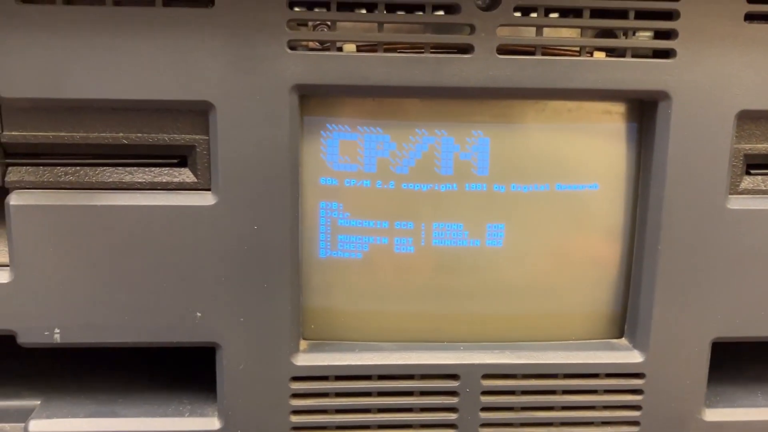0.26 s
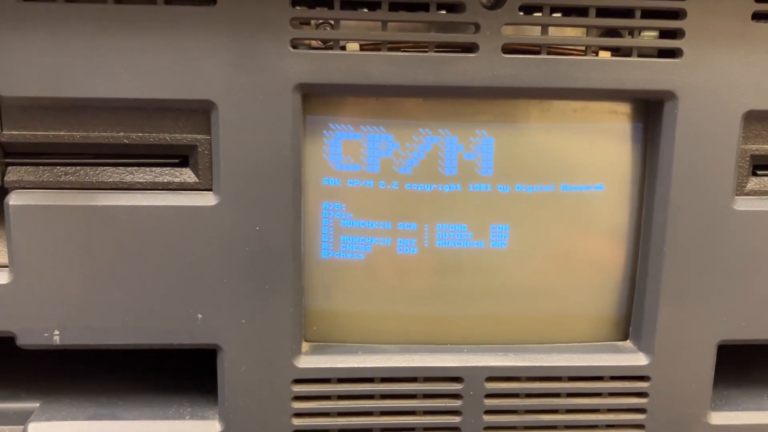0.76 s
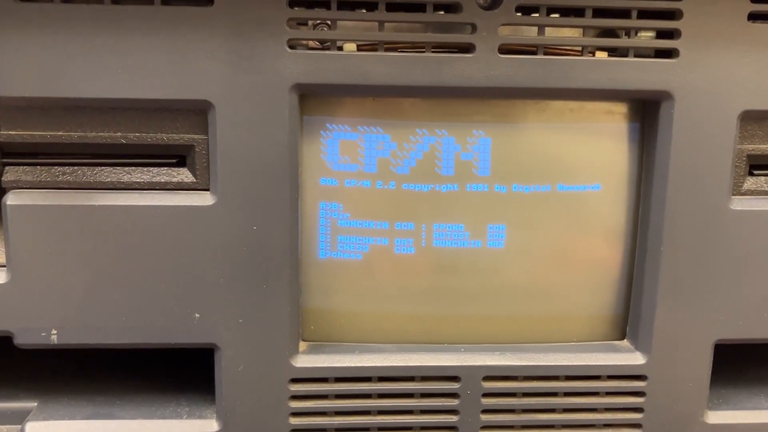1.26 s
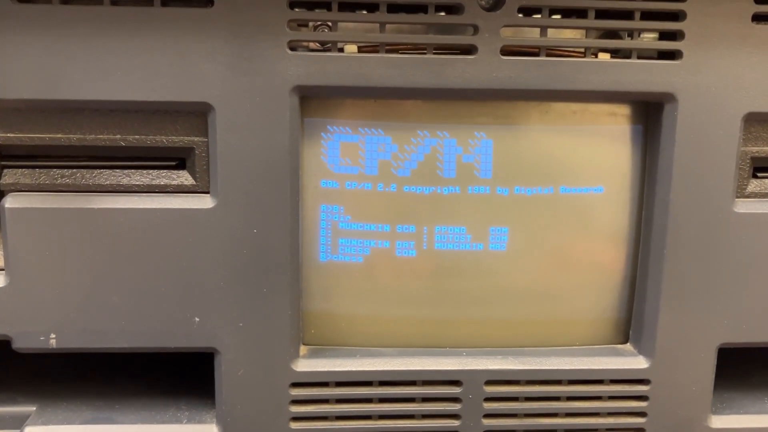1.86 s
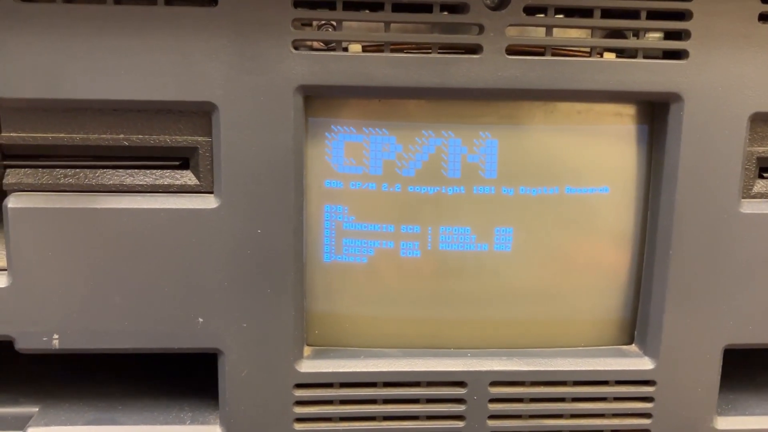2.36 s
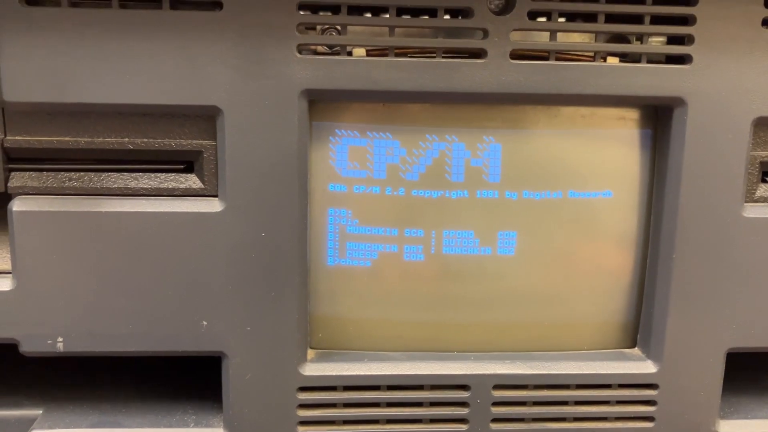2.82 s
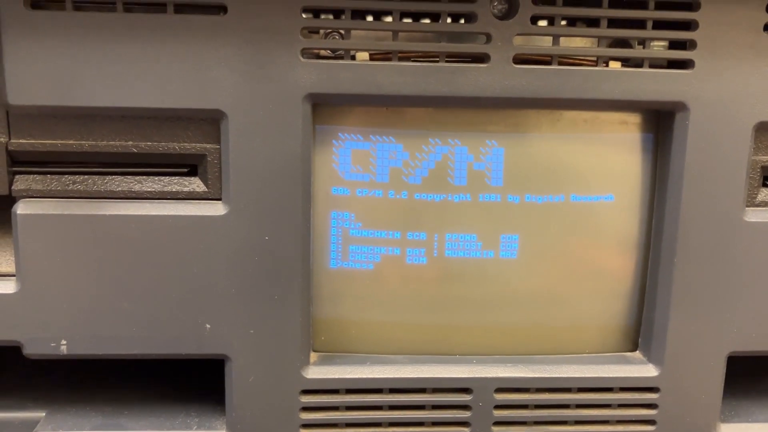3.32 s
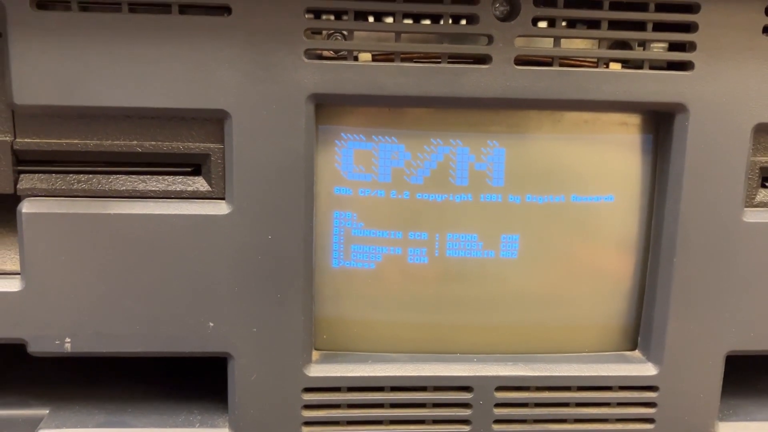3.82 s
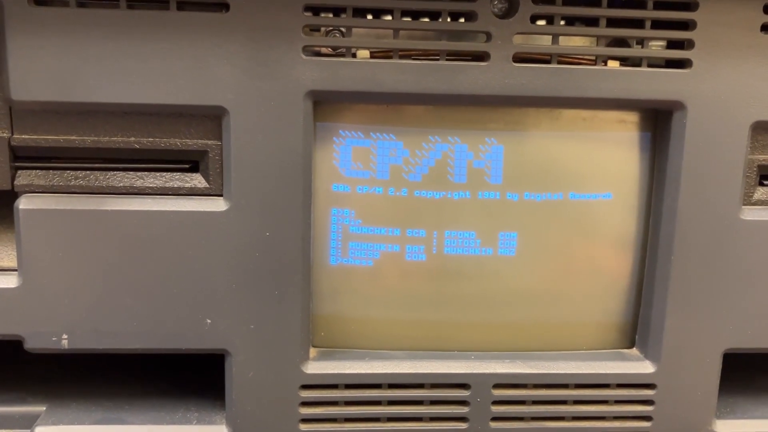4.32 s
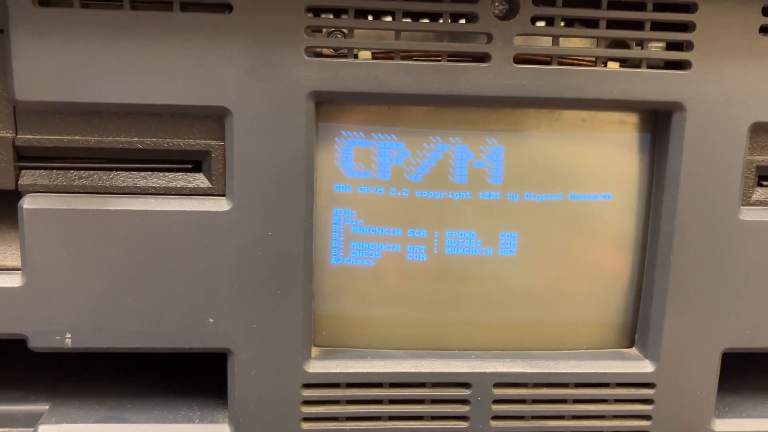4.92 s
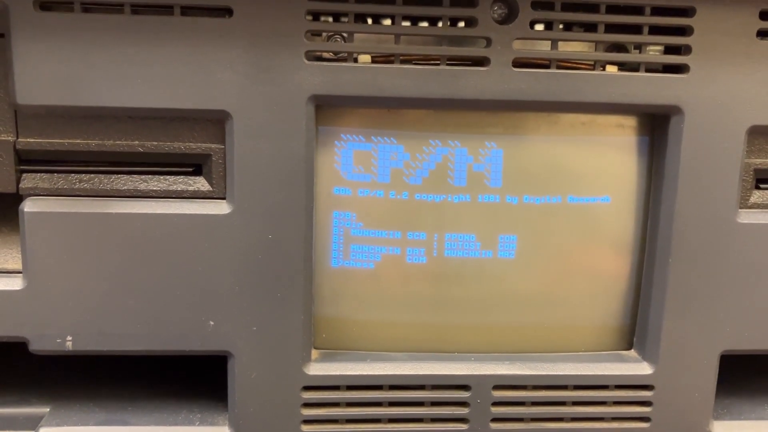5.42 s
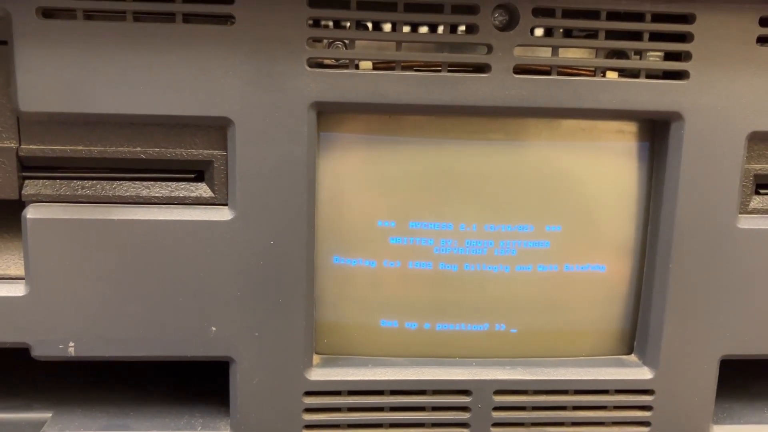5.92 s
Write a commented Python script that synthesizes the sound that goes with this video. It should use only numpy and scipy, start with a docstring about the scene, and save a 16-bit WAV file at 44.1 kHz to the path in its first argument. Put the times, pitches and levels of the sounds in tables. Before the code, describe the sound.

An old computer is heard from close by indoors. Throughout, a drive motor whines with a light hiss and faint fast ticking, over a low mains hum, a soft rush of air and a thin, very high picture tube whistle. The spinning disk ticks faintly five times a second. From the start until about 3.1 seconds, the floppy drive's head steps six times, one short double click every 0.6 seconds. Soft low bumps come irregularly between 0.6 and 5.4 seconds, and small dry clicks fall near 2, 3.9 and 4.4 seconds. From 3.7 to 4.4 seconds the head makes a long seek, a buzzing growl with rattling rasps, strongest at its start. A second seek follows from 4.5 to 5.2 seconds, rasping more toward its end. The machine then idles, whining and humming, until about 6 seconds.

```python
"""An old computer heard from close by. From the start a motor turns (whine, brush noise, a bright tick
each turn), the disk ticks, the picture tube whistles and the mains hums over the rush of case and room.
For three seconds the disk head steps one track at a time; soft low bumps come and go, and from 2 s
something small clicks now and then. At 3.7 s and 4.5 s the head makes two long runs across the disk
(seeks): its stepper motor growls, and its carriage rasps where it binds. Then the machine idles."""
import sys
import numpy as np
from scipy.fft import rfft, irfft, next_fast_len
from scipy.io import wavfile
from scipy.ndimage import map_coordinates

SR = 44100
rng = np.random.default_rng(int(sys.argv[2]) if len(sys.argv) > 2 else 0)


def store_wav(level_fs):
    """Save 16-bit WAV to argv[1]."""
    pcm = np.round(np.clip(np.atleast_2d(level_fs), -1, 1) * 32767)
    wavfile.write(sys.argv[1], SR, pcm.T.astype(np.int16))


N = 272538
TIME = np.arange(N) / SR
STEP_S, DISK_TURN_S = .02003, .20045  # time between seek steps, time for one disk turn

# the two seeks: start t/s, stop t/s, smooth-step rattle level/dB, growl level/dB (both relative)
SEEKS = [(3.678, 4.351, -43.5, -42.5), (4.513, 5.227, -50.5, -44)]
# how far a wave at the left microphone port is ahead of the right: f/Hz, lead/rad
LEFT_LEAD = [(0, 0), (40, -.7), (130, -.6), (200, 0), (900, 0), (1600, -.9), (2200, -1.9), (3000, -3.4),
             (5860, -10.4), (9560, -16.1), (15600, -25)]


def amp(db):
    """Turn decibels into a factor to multiply by."""
    return 10 ** (np.asarray(db) / 20)


def along(points, hz):
    """Read a curve of (frequency, value) points at hz, on a log frequency axis."""
    f, value = np.transpose(points)
    return np.interp(np.log(hz + 1), np.log(f + 1), value)


def wobble(rate):
    """A smooth random curve through `rate` new values a second."""
    coarse = TIME[::32]
    values = rng.standard_normal(int(N * rate / SR) + 4)
    return np.interp(TIME, coarse, map_coordinates(values, [coarse * rate]))


def noise(db):
    """Two unrelated white noises at a level that may change over time."""
    return amp(db) * rng.standard_normal((2, N))


def filtered(x, response):
    """Scale and delay each frequency of x as response(hz) says."""
    size = next_fast_len(N + SR // 2)
    return irfft(rfft(x, size) * response(np.fft.rfftfreq(size, 1 / SR)), size)[..., :N]


def ringing(table):
    """The response of a part that rings at each row's (frequency, width, relative level)."""
    return lambda hz: sum((-1) ** k * amp(db) * 1j * hz * width / (f * f - hz * hz + 1j * hz * width)
                          for k, (f, width, db) in enumerate(table))


def ringing_between(table, low_hz, high_hz):
    """The same ringing, fading steeply below low_hz and above high_hz."""
    return lambda hz: ringing(table)(hz) / (1 + (hz / high_hz) ** 16 + (low_hz / (hz + 1)) ** 8)


def at_mic(pair, colour):
    """Shape two noises by `colour` (tone, not level) and blend them into the two microphone ports."""
    # how alike left and right are: f/Hz, likeness/0-1
    likeness = [(30, 0.35), (100, 0.7), (300, 0.99), (800, 0.55), (2000, 0.6), (5000, 0.36), (9000, 1),
                (14000, 1)]
    # how much louder the left is: f/Hz, left minus right/dB
    balance = [(60, 2.5), (200, -2), (500, 6), (850, 3.5), (1290, 4.5), (2000, 8.5), (2800, 9), (3600, 2.5),
               (5000, 5), (6500, -1.5), (15000, 1.5)]

    def response(hz):
        angle = np.arccos(np.clip(along(likeness, hz), 0, 1)) / 2
        blend = np.array([[np.cos(angle), np.sin(angle)], [np.cos(angle), -np.sin(angle)]])
        lead = np.interp(hz, *np.transpose(LEFT_LEAD))
        left = amp(along(balance, hz) / 2) * np.exp(.5j * lead)
        return colour(hz) * blend * [[left], [1 / left]]
    power = np.mean(np.abs(colour(np.fft.rfftfreq(8192, 1 / SR))) ** 2)
    return filtered(pair, response).sum(axis=1) / np.sqrt(power)


def track_steps():
    """Six track changes, one every third disk turn: a soft contact, then a harder one."""
    # the two contacts: rattle level/dB, treble share/dB, brightness/dB, slide length/s
    soft = (-41, -21, 0, .007)
    hard = (-36.5, -18, 4.5, .008)
    rows = []
    for start in .068 + 3 * DISK_TURN_S * np.arange(6):
        rows += [(start - .0185, *soft), (start, *hard)]
    return rows


def seek_steps():
    """A seek steps at a fixed rate: smoothly, except where the carriage binds and rasps."""
    # rasps: t/s, length/s, first rattle level/dB, last rattle level/dB, treble share/dB, brightness/dB
    rasps = [(3.678, .1, -31.5, -39, -17, 3), (3.798, .06, -35.5, -39, -14, 3),
             (3.958, .06, -38.5, -37, -16, 3), (4.119, 0, -39.5, -39.5, -20, 2),
             (4.179, .16, -38.5, -40, -13, 0), (4.513, .04, -36, -39, -16, -1),
             (4.693, .06, -45, -39, -19, 2), (4.914, .02, -48, -44, -26, -2),
             (5.014, .06, -43, -37.5, -21, -1), (5.094, .12, -39.5, -36, -20, 0)]
    # a smooth step: treble share/dB, brightness/dB
    smooth = (-28, -2)
    rows = []
    for start, end, smooth_db, _ in SEEKS:
        when = np.arange(start, end, STEP_S)
        rattle, treble, bright, slide_s = np.outer([smooth_db, *smooth, .0098], np.ones(len(when)))
        for first, span, first_db, last_db, treble_db, bright_db in rasps:
            inside = np.abs(when - first - span / 2) < (span + STEP_S) / 2
            rattle[inside] = np.interp(when[inside], [first, first + span + 1 / SR], [first_db, last_db])
            treble[inside], bright[inside] = treble_db, bright_db
        late, louder, brighter = rng.standard_normal((len(when), 3)).T
        rows += zip(when + .0003 * late, rattle + .5 * louder, treble, bright + 2 * brighter, slide_s)
    return rows


def disk_head():
    """Each step strikes the head's carriage, rattles it while it slides, then stops short."""
    # the parts that ring: f/Hz, width/Hz, relative level/dB
    carriage_low = [(1540, 138, 0.5), (1986, 280, -5), (2230, 153, -1.5), (2708, 215, -2)]
    carriage_high = [(3110, 240, -9), (3462, 146, -0.5), (4096, 130, -1), (4156, 136, -3.5)]
    drive_housing = [(466, 49, 5), (762, 97, 2.5), (953, 250, -4), (1270, 280, -6.5)]
    guide_rail = [(4800, 480, 0.5), (5600, 570, -1), (6640, 360, 0), (7540, 180, -3), (7990, 180, -1)]
    low, mid, high = np.zeros((3, 2, N + SR))
    t = np.arange(SR // 20) / SR
    repeated = rng.standard_normal((2, len(t)))  # the part of the rattle that every step shares
    attack = 1 - np.exp(-t / .00012)
    blow = 1.3 * amp(-60 * t / .0018)
    grinding_tail = amp(-9 - 60 * t / .19)
    for start, db, treble_db, bright_db, slide_s in track_steps() + seek_steps():
        slide = amp(-250 * t - 2600 * np.clip(t - slide_s, 0, 1))
        rattle = .33 * repeated + .83 * rng.standard_normal(repeated.shape)
        burst = amp(db) * attack * (blow + slide + grinding_tail) * rattle
        at = slice(round(start * SR), round(start * SR) + len(t))
        low[:, at] += burst
        mid[:, at] += burst * amp(bright_db)
        high[:, at] += burst * amp(treble_db + 1.5 - 600 * t)
    carriage = amp(-3) * at_mic(low[:, :N], ringing_between(carriage_low, 840, 4200))
    carriage += amp(-10) * at_mic(mid[:, :N], ringing_between(carriage_high, 1200, 5750))
    housing = amp(-5.5) * at_mic(low[:, :N], ringing_between(drive_housing, 270, 1650))
    rail = at_mic(high[:, :N], ringing_between(guide_rail, 2900, 8800))
    return carriage + housing + rail


def stepper_growl():
    """During a seek the stepper shakes the frame: wavering multiples of the step rate over a rumble."""
    # the growl's tones: multiple of the step rate
    multiples = [2, 3, 4, 5, 6, 7, 8, 9, 10, 11, 12, 14, 15, 16]
    # one for each tone: relative level/dB
    tone_levels = [-1.5, -3, -2.5, -5, -16.5, -17, -12, -7.5, -12, -8.5, -13.5, -12, -9.5, -29]
    # boost of the tone at three times the step rate: t/s, level/dB
    third_boost = [(3.7, -3), (3.9, -0.5), (4.12, 5.5), (4.35, 1), (4.55, -5), (4.65, -15), (4.8, 8),
                   (5.2, 3.5)]
    # the ringing frame: f/Hz, width/Hz, relative level/dB
    frame = [(141, 109, -5), (257, 44, -7), (450, 57, -16), (574, 120, -9.5), (890, 300, -13.5)]
    attack_s, release_s = .016, .064
    level = sum(amp(db) * np.interp(TIME, [start, start + attack_s, end, end + release_s], [0, 1, 1, 0])
                for start, end, _, db in SEEKS)
    level *= amp(-9 * np.exp(-((TIME - 4.23) / .05) ** 2))  # the growl dips briefly
    third_db = np.interp(TIME, *np.transpose(third_boost))
    tones = 0
    for multiple, db in zip(multiples, tone_levels):
        gain = amp(db + 2.6 * wobble(10) + third_db * (multiple == 3))
        phase = 2 * np.pi * (multiple * TIME / STEP_S + rng.uniform()) + .21 * wobble(6)
        tones += gain * np.sin(phase)
    rumble = at_mic(level * noise(-3), ringing(frame))
    return np.sqrt(2) * level * tones + rumble


def motor():
    """The shaft whines, the brushes pulse as it turns, the bearings hiss, and each turn gives a tick."""
    # the whine's tones: multiple of the turning speed
    multiples = [6, 7, 8, 10, 13, 14, 15, 17, 19, 21, 22, 24, 25, 35, 41, 42, 45, 46, 49, 51, 53, 54, 61,
                 62, 67, 68, 73, 74]
    # one row for each tone: level/dB, left minus right/dB
    tone_levels = [(-61, 14.5), (-51.5, -1), (-66, -11), (-61, 5.5), (-56.5, 5.5), (-64, 3), (-49.5, 2.5),
                   (-57.5, 3.5), (-62, 3), (-49.5, -1.5), (-57, -3.5), (-56.5, 8), (-72, 19), (-76.5, -4),
                   (-78, -6), (-65.5, -2), (-62, 1.5), (-63, 11), (-70, -1), (-68, 6.5), (-66.5, 6),
                   (-72, 8), (-71, 6.5), (-74.5, 17), (-69.5, 12.5), (-71, -4.5), (-71, 15.5), (-71, -8)]
    # tone colour of the brushes and the bearings: f/Hz, relative level/dB
    brush_colour = [(1000, -73), (1200, -13), (1550, -5.5), (1680, 1), (1850, -9), (2000, -6), (2300, -9.5),
                    (2750, -10), (3200, -14), (4300, -19.5), (4900, -15), (5600, -18), (6300, -31),
                    (7200, -54)]
    bearing_colour = [(6000, -76), (7000, -36), (8000, -11), (9200, -16), (9500, 6), (10400, -1.5),
                      (10750, -36), (11000, -6), (11500, -1), (12100, -4.5), (13000, -3.5), (13700, -36),
                      (14400, -60), (15000, -42)]
    # what the tick rings: f/Hz, width/Hz, relative level/dB
    tick_ring = [(10360, 210, -10), (10970, 180, -9.5), (10285, 110, -6.5)]
    turn_hz, first_tick_s = 37.032, .0125
    turns = turn_hz * (TIME - first_tick_s)
    sides = np.array([[.5], [-.5]])  # half up on the left, half down on the right
    whine = np.zeros((2, N))
    for multiple, (db, pan_db) in zip(multiples, tone_levels):
        lead = np.interp(multiple * turn_hz, *np.transpose(LEFT_LEAD))
        phase = 2 * np.pi * (multiple * turns + rng.uniform()) + lead * sides
        whine += np.sqrt(2) * amp(db + 1.66 * wobble(7) + pan_db * sides) * np.sin(phase)
    pulse_db = .99 * np.cos(2 * np.pi * (turns - .4)) + .5 * np.cos(6 * np.pi * turns) + wobble(30)
    brushes = at_mic(noise(-56.5 + pulse_db), lambda hz: amp(along(brush_colour, hz)))
    bearings = at_mic(noise(-64 + 1.1 * wobble(4.15)), lambda hz: amp(along(bearing_colour, hz)))
    uneven_db = rng.normal(0, .66, int(turns[-1]) + 3)[turns.astype(int) + 1]
    since_tick = turns % 1 / turn_hz
    snap = amp(-60 * since_tick / .018)
    tail = amp(-5 - 60 * since_tick / .14)
    ticks = at_mic((snap + tail) * noise(-56 + uneven_db), ringing(tick_ring))
    return whine + brushes + bearings + ticks


def bumps():
    """Soft low bumps: a few waves that swell and fade, slightly out of step left and right."""
    # the bumps: t/s, peak level/dB, f/Hz, length/s
    events = [(0.59, -32.5, 54, 0.062), (1.156, -32, 52, 0.048), (1.241, -35, 55, .04),
              (1.272, -27, 54, 0.069), (1.849, -26, 61.4, 0.046), (2.393, -31.5, 55, 0.043),
              (2.447, -24, 58, 0.055), (3.045, -35, 60, 0.059), (3.271, -35, 55, 0.063),
              (4.303, -23.5, 62.5, 0.043), (5.354, -37.5, 78.4, 0.046)]
    out = np.zeros((2, N + SR))
    for start, db, hz, length in events:
        t = np.arange(round(length * SR)) / SR
        skew = rng.normal(0, .3)
        wave = -np.cos(2 * np.pi * hz * (t - length / 2) + np.array([[skew], [-skew]]))
        at = round(start * SR)
        out[:, at:at + len(t)] += amp(db) * np.sin(np.pi * t / length) * wave
    return out[:, :N]


def clicks():
    """Lone dry clicks: a short burst of noise rings a small loose part."""
    # the clicks: t/s, level/dB
    events = [(2.029, -39), (3.9077, -30.5), (4.449, -36)]
    # the loose part: f/Hz, width/Hz, relative level/dB
    loose_part = [(2270, 350, 0), (2720, 300, -1), (3970, 300, -7.5), (7950, 250, -15.5)]
    fade_s = .041  # time to fall by 60 dB
    level = sum(amp(db - 60 * np.abs(TIME - start) / fade_s) * (TIME >= start) for start, db in events)
    return at_mic(level * noise(0), ringing(loose_part))


def disk_ticks():
    """The disk turns five times a second; a faint uneven tick comes with every turn."""
    turns = (TIME - .1315) / DISK_TURN_S
    nearest = np.round(turns).astype(int)
    uneven_db = rng.normal(0, 1.4, nearest[-1] + 2)[nearest + 1]
    from_tick_s = (turns - nearest) * DISK_TURN_S
    level = amp(-52.5 + uneven_db) * np.exp(-(from_tick_s / .0027) ** 2)
    return at_mic(level * noise(0), ringing([(2740, 200, 0)]))


def mains_hum():
    """The mains supply hums on one low, wavering tone."""
    hum_hz, hum_db = 119.9, -47.5
    level = amp(hum_db + .83 * wobble(4.6))
    return np.sqrt(2) * level * np.sin(2 * np.pi * hum_hz * TIME + .31 * wobble(5))


def tube_whistle():
    """The picture tube whistles on one very high tone that slowly swells and fades."""
    # the whistle's slow rise and fall: t/s, level/dB
    swell = [(0, -58), (.9, -57.5), (2.4, -57), (3.5, -52.5), (4.6, -54), (5, -57), (5.85, -53),
             (6.18, -55.5)]
    whistle_hz = 15602
    level_db = np.interp(TIME, *np.transpose(swell)) + 1.2 * wobble(45)
    side_db = .5 * np.array([wobble(3), wobble(3)])
    skew = .17 + .089 * wobble(3)
    phase = 2 * np.pi * whistle_hz * TIME + np.array([skew, -skew])
    return np.sqrt(2) * amp(level_db + side_db) * np.sin(phase)


def air():
    """The low rush of the case and the room."""
    # tone colour of the rush: f/Hz, relative level/dB
    colour = [(16, -55), (28, -2), (45, 1), (119, 3.5), (166, -1), (265, -4.5), (302, -7.5), (422, -15.5),
              (546, -10.5), (673, -12.5), (778, -9), (913, -21), (1040, -25.5), (1300, -29.5), (1800, -44)]
    # its slow rise and fall: t/s, level/dB
    swell = [(0, -40), (.6, -40.5), (2, -41.5), (3.5, -40.5), (5, -40.5), (6.18, -42.5)]
    level_db = np.interp(TIME, *np.transpose(swell)) + .5 * wobble(8.3)
    return at_mic(noise(level_db), lambda hz: amp(along(colour, hz)))


def scene():
    """All the sources added up at the microphone."""
    moving_parts = disk_head() + stepper_growl() + motor() + bumps() + clicks() + disk_ticks()
    return moving_parts + mains_hum() + tube_whistle() + air()


def record(dry):
    """Cut everything above 16 kHz."""
    return filtered(dry, lambda hz: hz < 16000)


dry = scene()
out = record(dry)
store_wav(out)
```